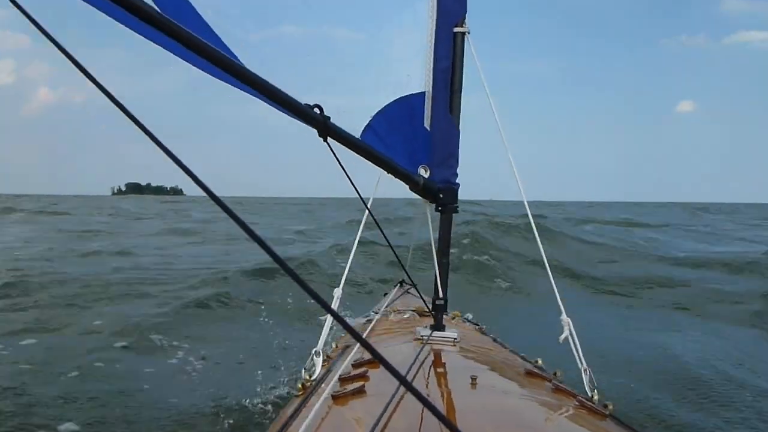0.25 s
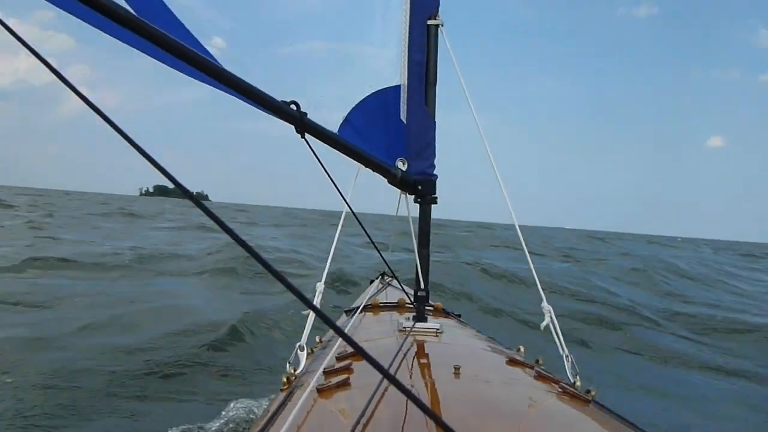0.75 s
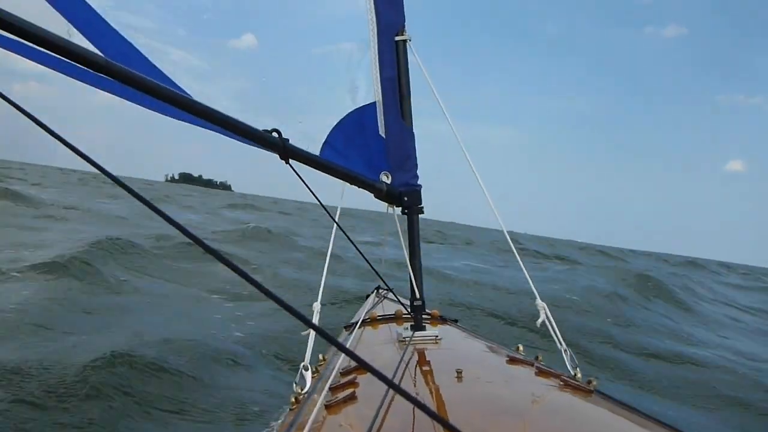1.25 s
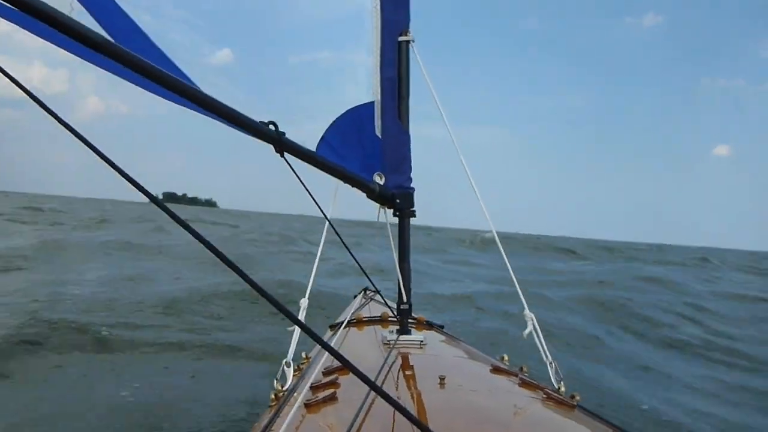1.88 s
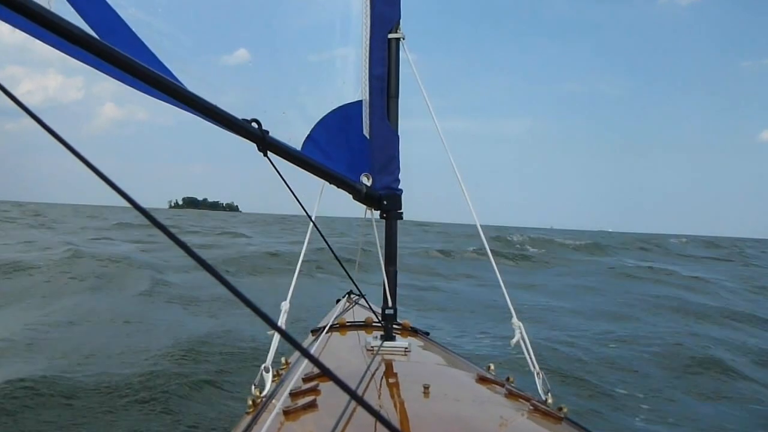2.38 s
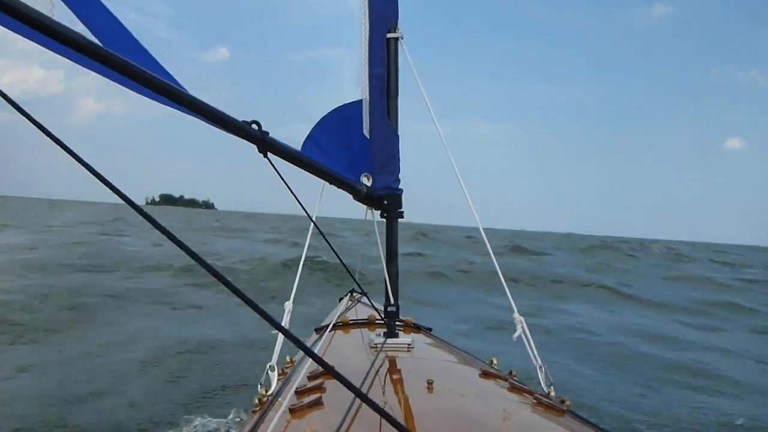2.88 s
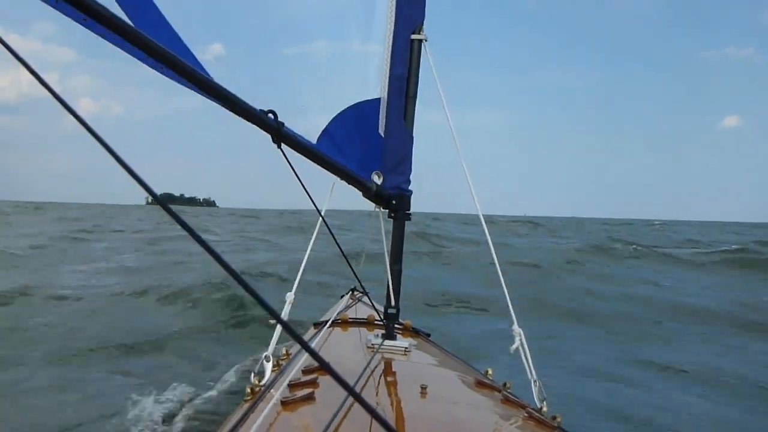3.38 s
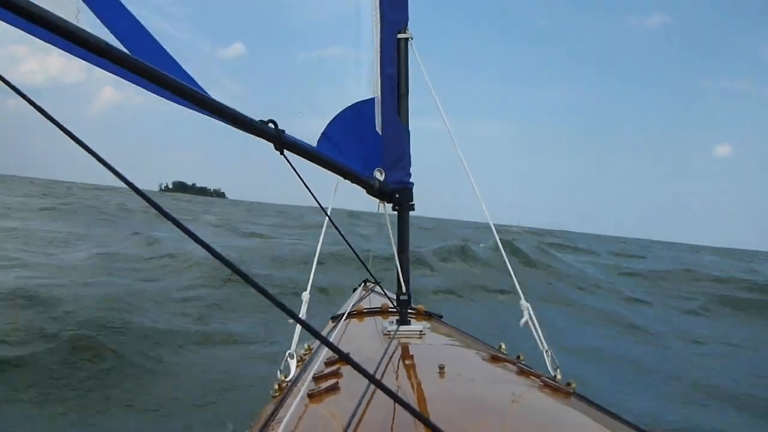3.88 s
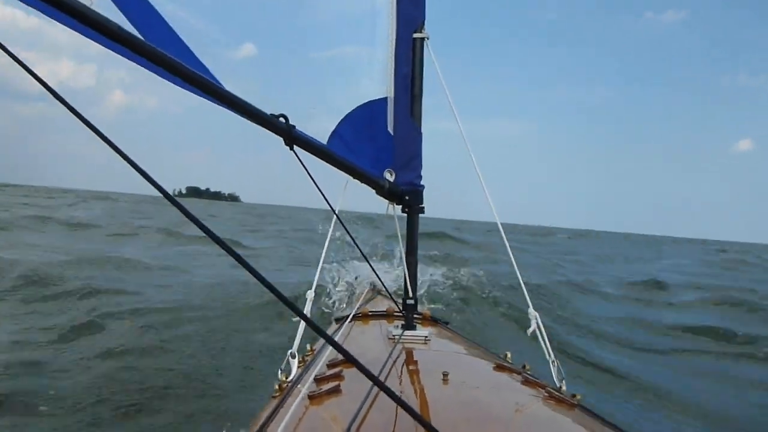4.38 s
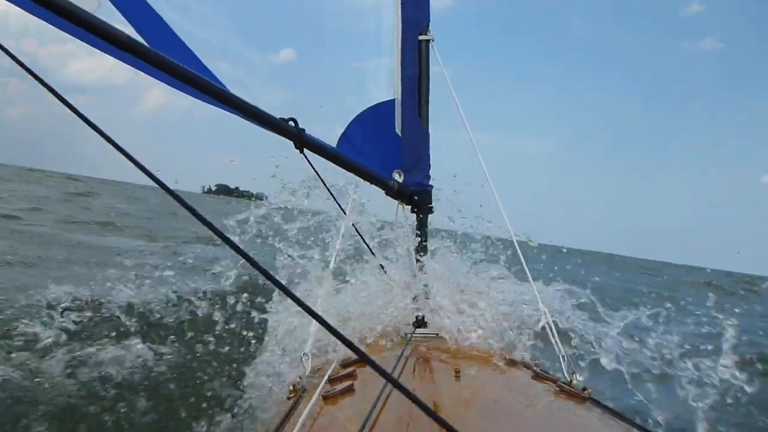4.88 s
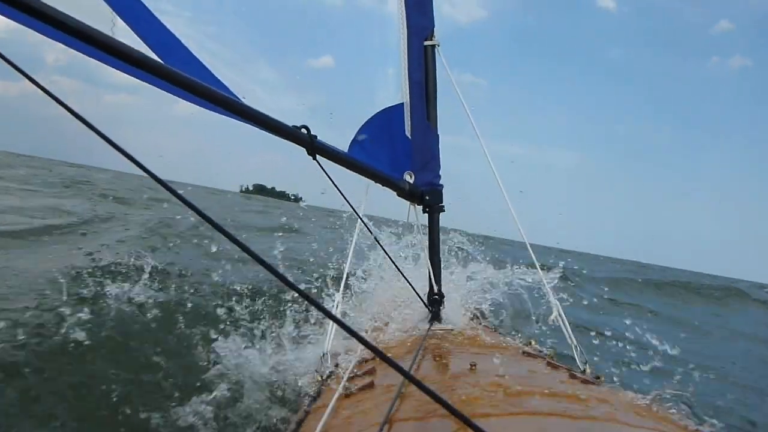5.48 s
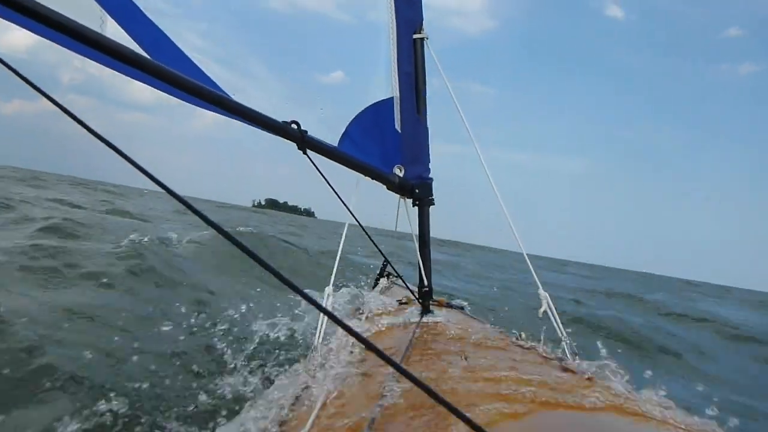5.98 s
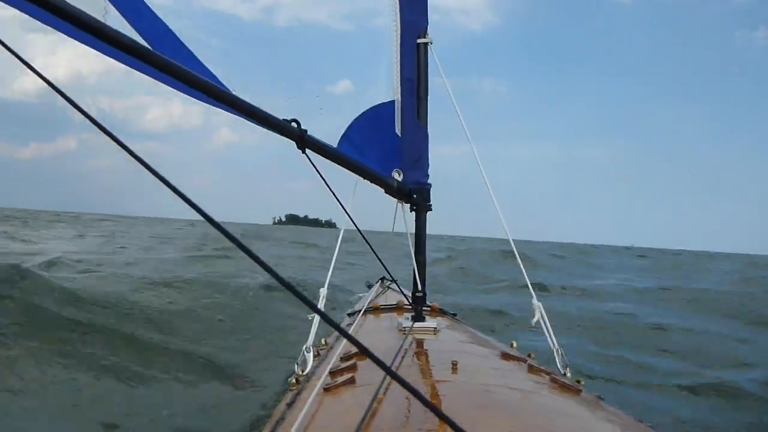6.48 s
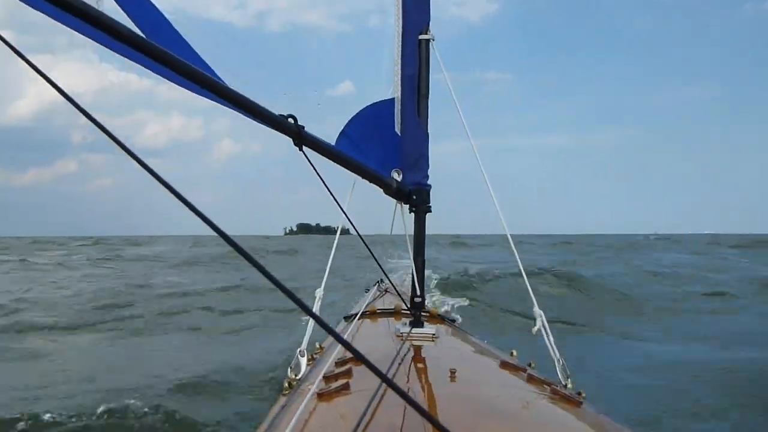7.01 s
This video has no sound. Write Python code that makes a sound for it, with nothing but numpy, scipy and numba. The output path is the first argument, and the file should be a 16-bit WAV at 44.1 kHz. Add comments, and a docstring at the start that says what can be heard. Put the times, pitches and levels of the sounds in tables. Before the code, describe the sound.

Choppy waves glug and slosh against a small wooden sailboat as spray hisses, drops tick on deck and wind thumps the microphone.

```python
"""Small wooden boat in chop

A camera in the cockpit hears water rushing along the hull. The wash is hiss full of bursting
bubbles, with finer spray above it. Waves glug against the planks, drops tick on the deck
and gusts rumble and thump on the microphone port."""
import sys
import numpy as np
from scipy import signal
from scipy.fft import rfft, irfft
from scipy.io import wavfile
from scipy.ndimage import uniform_filter1d
from numba import njit

SR = 44100
rng = np.random.default_rng(int(sys.argv[2]) if len(sys.argv) > 2 else 0)


def generate_wav(signal):
    """Clip the signal to [-1, 1] and save it as 16-bit WAV at the path in sys.argv[1]."""
    frames = np.transpose(np.atleast_2d(signal))
    scaled = np.clip(frames, -1, 1) * 32767
    pcm = np.round(scaled).astype(np.int16)
    wavfile.write(sys.argv[1], SR, pcm)


N = 319725
TOP_HZ = 7850  # camera band edge


def undb(db):
    """Decibels to gain."""
    return 10 ** (np.asarray(db) / 20)


def unit(x):
    """Scale to rms 1."""
    return x / np.sqrt(np.mean(x ** 2))


def colour_db(spectrum, hz):
    """Interpolate a spectrum over log frequency; -90 dB outside it."""
    freq_hz, level_db = np.transpose(spectrum)
    return np.interp(np.log(hz), np.log(freq_hz), level_db, left=-90, right=-90)


def walk(rate_hz):
    """Smoothed random steps, slow drift removed, standard deviation 1."""
    hold = int(SR / rate_hz)
    steps = np.repeat(rng.standard_normal(N // hold + 1), hold)
    smooth = uniform_filter1d(uniform_filter1d(steps, hold), hold)[:N]
    flutter = smooth - uniform_filter1d(smooth, 3 * hold)
    return flutter / flutter.std()


@njit
def grains(peak, hz, tau, gain, glide, phase, rise):
    """Gliding rings that swell and die; peak and tau in samples, rise in taus, glide per tau."""
    out = np.zeros(N)
    for k in range(len(peak)):
        start, angle = int(peak[k] - rise * tau[k]), phase[k]
        for j in range(int((rise + 5) * tau[k])):
            age = j / tau[k] - rise
            angle += 2 * np.pi * hz[k] * (1 + glide[k] * min(age, 1.5)) / SR
            if age < 0:
                envelope = np.sin(.5 * np.pi * (1 + age / rise)) ** 2
            else:
                envelope = (1 + 2 * age) * np.exp(-2 * age)
            if 0 <= start + j < N:
                out[start + j] += gain[k] * envelope * np.sin(angle)
    return out


def hiss(spectrum, swell_db, flicker_db, flicker_hz):
    """Noise in half-octave bands that swell together and flicker separately."""
    hz = np.maximum(np.fft.rfftfreq(N, 1 / SR), 1)
    coloured = rfft(rng.standard_normal(N)) * undb(colour_db(spectrum, hz))
    out = 0
    for band in range(int(2 * np.log2(spectrum[0][0])), int(2 * np.log2(spectrum[-1][0])) + 2):
        share = np.clip(1 - abs(2 * np.log2(hz) - band), 0, 1)
        out = out + irfft(coloured * share, N) * undb(flicker_db * walk(flicker_hz))
    return unit(out * undb(swell_db))


def swarm(spectrum, cycles, glide, scatter_db, count):
    """Rings at random times and pitches; most weak, a few loud."""
    when, where, strength, turn = rng.random((count, 4)).T
    lo, hi = np.sqrt(spectrum[0][0]), np.sqrt(spectrum[-1][0])
    hz = (lo + (hi - lo) * where) ** 2
    gain = hz ** 0.74 * undb(colour_db(spectrum, hz) - scatter_db * np.log(1 - .99 * strength))
    return unit(grains(when * N, hz, cycles * SR / hz, gain, glide * turn, 2 * np.pi * turn, rise=0.4036))


def rings(events, cycles, side_gain, spread_oct, side_length, glide=0):
    """One main ring per event, made dry by four shorter side rings at random pitches."""
    time_s, level_db, hz = np.transpose(events)[:3]
    gain = undb(level_db)
    glide = glide + np.zeros_like(hz)
    tau = cycles * SR / hz / 1.63
    phase = 2 * np.pi * rng.random(len(hz))
    out = grains(time_s * SR - 0.296 * tau, hz, tau, gain, glide, phase, rise=0.305)
    for side in (-1.1, -0.58, 0.1, 0.94):
        detune, late, turn = rng.random((len(hz), 3)).T
        side_hz = np.minimum(hz * 2 ** (spread_oct * side * (.5 + detune)), TOP_HZ - 1000)
        peak = time_s * SR + tau * (late - .6)
        out += grains(peak, side_hz, side_length * tau, side_gain * gain, glide, 2 * np.pi * turn, 0.28)
    return out


def splats(events, cycles, band_hz, gain_db):
    """Dry noise crack at each onset, as water breaks on the wood."""
    time_s, level_db, hz = np.transpose(events)[:3]
    tau = cycles * SR / hz
    zero = np.zeros_like(hz)  # a 0 Hz grain is a bare envelope
    envelope = grains(time_s * SR - tau, zero, tau, undb(level_db + gain_db), zero, zero + np.pi / 2, .39)
    bandpass = signal.butter(2, band_hz, "band", fs=SR, output="sos")
    return signal.sosfilt(bandpass, envelope * rng.standard_normal(N))


def gust_gain(t):
    """Each gust climbs out of the lull, holds and dies away."""
    # start_s, hold_s, level_db
    gusts = [(0.156, 0.0092, -42), (0.244, 0.017, -35), (0.375, 0.017, -36), (0.61, 0.022, -32.5),
             (0.71, 0.033, -41), (0.872, 0.31, -35), (1.232, 0.17, -36.5), (1.46, 0.13, -31.5),
             (1.7, 0.078, -40), (1.782, 0.089, -28.5), (1.958, 0.17, -33.5), (2.196, 0.22, -45),
             (2.424, 0.021, -33.5), (2.687, 0.054, -43), (2.86, 0.026, -42.5), (3.08, 0.037, -31),
             (3.127, 0.17, -39), (3.47, .03, -36.5), (3.68, 0.058, -42), (3.785, 0.046, -28),
             (4.125, 0.035, -32.5), (4.69, 0.016, -48), (4.904, .02, -40), (5.07, .02, -38.5),
             (6.287, 0.058, -37.5), (6.62, 0.091, -45), (6.722, 0.26, -34), (6.946, 0.12, -34)]
    lull_db, rise_db_per_s, fall_db_per_s = -53, 500, 298.5
    power = undb(lull_db) ** 2
    for start_s, hold_s, level_db in gusts:
        before_db = rise_db_per_s * np.maximum(start_s - t, 0)
        after_db = fall_db_per_s * np.maximum(t - start_s - hold_s, 0)
        power = power + undb(level_db - before_db - after_db) ** 2
    return np.sqrt(power)


def wind():
    """Turbulence on the microphone port: lumpy rumble and single-cycle puffs."""
    # freq_hz, density_db
    spectrum = [(15, -52.5), (25, -34.5), (64, -7), (161, -1.5), (330, 0.5), (392, -5.5), (430, -9),
                (600, -28.5), (780, -40.5), (1320, -120)]
    lumps_db = 1.9 * walk(18)
    rumble = hiss(spectrum, lumps_db, flicker_db=2.2, flicker_hz=12)
    puffs = swarm(spectrum, cycles=0.75, glide=-0.023, scatter_db=0.8, count=600)
    return unit(rumble + .5 * puffs * undb(lumps_db))


def thumps():
    """Single wind buffets on the port."""
    # time_s, level_db, pitch_hz
    buffets = [(0.2544, -19, 297), (0.39, -28, 200), (0.6366, -23, 170), (0.9808, -17.5, 169),
               (1.0097, -18, 394), (1.0302, -14.5, 348), (1.0511, -19, 250), (1.0661, -16, 218),
               (1.1165, -26, 286), (1.1559, -16, 368), (1.2447, -23.5, 241), (1.2721, -19, 342),
               (1.3469, -22.5, 240), (1.3704, -26, 332), (1.4976, -21, 300), (1.533, -20, 200),
               (1.5525, -11, 345), (1.5929, -22, 302), (1.756, -24, 250), (1.8039, -24, 193),
               (1.8598, -17, 368), (1.8982, -20, 202), (1.9281, -15, 202), (1.994, -12, 406),
               (2.0643, -18, 260), (2.435, -24, 202), (3.075, -17, 247), (3.1454, -24, 237),
               (3.499, -28, 170), (3.7764, -21, 257), (3.8273, -23, 172), (4.152, -26, 170),
               (6.7551, -23, 282), (6.7756, -17, 352), (6.8519, -22, 177), (6.8679, -21, 350),
               (7.02, -21.5, 208), (7.0839, -24.5, 187)]
    return rings(buffets, cycles=2.38, side_gain=0.23, spread_oct=1.0, side_length=0.75)


def sea_gains(t):
    """Gains of wash, gurgle and spray: the slow run of the water plus quick sloshes and lulls."""
    # time_s, wash_db, gurgle_over_wash_db, spray_over_wash_db
    run = [(0, -33.5, -3.5, -8), (.3, -33, -2, -10), (.7, -36.5, -1.5, -8.5), (.9, -34, -6, -9.5),
           (1.08, -41, -2.5, -8.5), (1.3, -38.5, -1.5, -9), (1.65, -38, -3.5, -7.5),
           (1.95, -33, -2.5, -8.5), (2.12, -31.5, -4, -8), (2.3, -26.5, -4, -7.5), (2.58, -26, -9, -6),
           (2.72, -31.5, -4, -7.5), (2.97, -32, -2.5, -6.5), (3.25, -30.5, -5, -11),
           (3.55, -28, -1.5, -7.5), (3.9, -28.5, 1.5, -7.5), (4.3, -29, -0.5, -7), (4.62, -28.5, 0, -7.5),
           (4.85, -25.5, -8, -7.5), (5.2, -24, -7.5, -6), (5.45, -21, -4.5, -6.5), (5.9, -24.5, -3, -7.5),
           (6.28, -22, -5, -7), (6.5, -29, -5.5, -8), (6.75, -30, -6, -7.5), (6.95, -35.5, -2.5, -7.5),
           (7.25, -34.5, -1.5, -7)]
    # small waves on the hull: time_s, width_ms, wash_swell_db, gurgle_swell_db, spray_swell_db
    sloshes = [(0.21, 30, -0.5, 4, 2.5), (0.85, 30, 2, 1, 2), (0.94, 15, 2, -4, -1.5),
               (1.09, 12, -4, -7, 0), (1.19, 21, -0.5, -5, -4), (1.43, 25, 4, -2, 1.5),
               (1.55, 15, 5.5, 4, 1), (1.7, 26, 5, 1, 0.5), (1.748, 18, 9, 7, 11), (2.04, 18, -2, 15.5, -4),
               (2.16, 22, -3, 7, -1), (2.22, 23, 3.5, 5.5, 0.5), (2.54, 21, 3.5, 6.5, 3),
               (2.81, 47, 5.5, 0.5, -1), (3.14, 34, 1.5, 1, 4), (3.31, 28, 1.5, 7, 5.5),
               (3.61, 28, 3, 3, 0.5), (3.74, 72, 4, -9, 4), (3.88, 25, 0, 8, 0), (4.0, 20, -1.5, 4, -2.5),
               (4.2, 34, 3, -3, 1.5), (4.54, 24, 2, 5, -2), (4.71, 54, 3, 0, 4), (5.089, 64, 3, 0, 3.5),
               (5.29, 45, -1.5, -7, -2.5), (5.45, 46, 1, 0, -1.5), (6.07, 55, 4.5, 2.5, 2),
               (6.33, 20, 0.5, -6, -2), (6.78, 23, -2.5, 5, 0), (7.13, 33, 5.5, -2, 1)]
    time_s, wash_db, gurgle_db, spray_db = np.transpose(run)
    tracks_db = (wash_db, wash_db + gurgle_db, wash_db + spray_db)
    level_db = np.array([np.interp(t, time_s, db) for db in tracks_db])
    for centre_s, width_ms, *swell_db in sloshes:
        width_s = width_ms / 1000 * np.where(t < centre_s, 0.69, 1)  # faster in than out
        level_db += np.outer(swell_db, np.exp(-((t - centre_s) / width_s) ** 2))
    return undb(level_db)


def spray(surge):
    """Foam and thrown droplets: fine hiss with crackle."""
    # freq_hz, density_db
    spectrum = [(1200, -12), (2000, -11), (3000, 4.5), (4200, -1.5), (5500, -4.5), (6500, -9), (8000, -31)]
    crackle = swarm(spectrum, cycles=2.2, glide=.05, scatter_db=4.5, count=9000)
    foam = hiss(spectrum, 0.36 * surge, flicker_db=0.68, flicker_hz=22)
    return unit(foam + 0.67 * crackle * undb(surge))


def drops():
    """Drops ticking on the deck."""
    # time_s, level_db, pitch_hz
    hits = [(0.8511, -30, 3640), (1.0319, -28.5, 2560), (1.0651, -30.5, 3780), (1.1092, -21, 3280),
            (1.1259, -20.5, 4100), (1.2112, -26.5, 6000), (1.308, -35, 5060), (1.3195, -29, 5250),
            (1.7615, -28, 3600), (1.8139, -28, 2900), (1.8221, -27, 4020), (1.9887, -31, 4750),
            (2.311, -21.5, 3130), (2.5732, -19.5, 5160), (2.6096, -21, 5200), (3.0481, -29, 5260),
            (3.0977, -25.5, 4450), (3.1177, -26, 4400), (3.1528, -18.5, 3300), (3.1788, -24, 4460),
            (3.3082, -17, 3600), (3.6869, -24, 5170), (3.7739, -21, 3980), (3.953, -21.5, 3450),
            (4.3434, -18.5, 5260), (4.7796, -21.5, 4900), (5.186, -19, 4070), (5.8996, -19, 2130),
            (5.9567, -12, 2420), (6.3311, -20, 4630)]
    ticks = rings(hits, cycles=10, side_gain=0.6, spread_oct=0.32, side_length=.35)
    return ticks + splats(hits, cycles=5.4, band_hz=(3000, 5100), gain_db=1.2)


def glugs():
    """Air pockets ringing along the planks."""
    # time_s, level_db, pitch_hz, length_cycles, glide_per_tau
    pockets = [(0.0609, -22.5, 690, 6.4, -0.023), (0.126, -23, 1800, 9.5, .14),
               (0.1741, -22, 686, 9, -0.14), (0.2088, -17.5, 1210, 11, -0.29),
               (0.3562, -18.5, 1480, 8.2, .03), (0.5253, -23.5, 690, 9, .03), (0.835, -20, 784, 9, -0.08),
               (0.8513, -16.5, 1440, 5.2, 0.11), (0.9419, -24, 730, 7.7, .3),
               (1.3125, -27, 1650, 10.5, -.08), (1.4829, -25, 1040, 6.7, 0.0067),
               (1.5515, -23, 1290, 10.5, -0.14), (1.8129, -21.5, 1290, 7.3, .01),
               (2.0383, -22, 453, 7.1, 0.17), (2.0463, -17.5, 405, 6.5, -0.059),
               (2.0603, -17.5, 1020, 6.1, 0.1), (2.2107, -17, 1200, 4.8, -0.05),
               (2.4971, -11, 1010, 6.2, 0.034), (2.5846, -19, 660, 9.5, .23),
               (2.6555, -20.5, 1160, 11, .08), (3.0366, -25, 460, 6, 0.06), (3.1052, -20, 348, 6.3, .01),
               (3.1307, -20, 330, 3.9, .01), (3.1611, -21.5, 653, 14, -0.07),
               (3.3015, -22.5, 460, 14, -0.002), (3.3389, -15, 1010, 8.6, -0.24),
               (3.4093, -19, 360, 4.3, .01), (3.421, -21, 1200, 15.5, 0.0058),
               (3.5265, -23.5, 388, 8.3, -0.099), (3.5605, -19, 384, 4.5, .01),
               (3.6163, -14.5, 420, 9.5, 0.055), (3.6342, -14, 392, 4, -0.036), (3.6627, -19, 380, 4, .01),
               (3.6862, -20, 380, 4.4, -0.08), (3.7185, -14, 1590, 9, .08), (3.7809, -12, 1820, 7.7, 0.31),
               (3.8191, -16.5, 1880, 8, .01), (3.8273, -19.5, 396, 8, .01), (3.8812, -12.5, 572, 9.5, .09),
               (3.903, -18, 297, 5, -0.019), (3.972, -23, 430, 8.3, 0.037), (3.9837, -19, 870, 9.5, -0.023),
               (4.0051, -15, 492, 6.9, -0.011), (4.1284, -16.5, 650, 12, 0.048),
               (4.1927, -18, 733, 12, 0.03), (4.2758, -18, 655, 11, 0.049), (4.2962, -19, 930, 10.5, 0.14),
               (4.3439, -17, 1640, 7.8, 0.16), (4.3814, -22, 390, 5.1, -0.032),
               (4.5389, -15.5, 990, 11, .38), (4.639, -15.5, 600, 8, 0.49), (4.6913, -13, 747, 12, 0.14),
               (4.7098, -16, 1590, 7.7, 0.065), (4.9123, -21, 353, 6.2, -0.043),
               (5.0755, -17.5, 710, 10.5, .25), (5.1725, -12.5, 1000, 8, -.07),
               (5.4269, -15.5, 577, 9, .01), (5.4773, -10.5, 606, 7.3, 0.08),
               (5.5025, -15, 513, 9.4, -0.078), (6.0782, -11, 1480, 8.2, -0.073),
               (6.163, -23.5, 443, 15, 0.021), (6.5531, -17, 1110, 4.9, 0.029),
               (6.617, -20.5, 850, 10.5, .19), (7.142, -21, 1090, 4.5, .03), (7.1932, -26, 460, 9, 0.24)]
    cycles, glide = np.transpose(pockets)[3:]
    ringing = rings(pockets, cycles, side_gain=0.15, spread_oct=.9, side_length=0.34, glide=glide)
    return ringing + splats(pockets, cycles=2.6, band_hz=(420, 2570), gain_db=2.7)


def wash(surge):
    """Water sliding along the hull, with bubbles rising in pitch; returns low gurgle and upper rush."""
    # freq_hz, density_db
    spectrum = [(88, -37), (150, -37), (182, -16.5), (495, 3), (708, 3), (827, 3), (1560, 0), (2600, -6.5),
                (3380, -44.5), (5720, -120)]
    flow = hiss(spectrum, 0.47 * surge, flicker_db=1.47, flicker_hz=16)
    bubbles = swarm(spectrum, cycles=3.964, glide=0.086, scatter_db=1.3, count=4000)
    water = unit(flow + 0.68 * bubbles * undb(1.54 * surge))
    gurgle = signal.sosfiltfilt(signal.butter(2, 680, fs=SR, output="sos"), water)
    return unit(gurgle), unit(water - gurgle)


def scene():
    """Wind, wash and spray with single events on top; mono."""
    t = np.arange(N) / SR
    wash_gain, gurgle_gain, spray_gain = sea_gains(t)
    surge = unit(walk(14) + walk(35))  # small waves breaking in quick bursts
    gurgle, rush = wash(surge)
    bed = gust_gain(t) * wind() + gurgle_gain * gurgle + wash_gain * rush + spray_gain * spray(surge)
    return (bed + drops() + glugs() + thumps())[None]


def record(dry):
    """The camera cuts bass and notches one band; its low sample clock faintly mirrors the treble."""
    # freq_hz, gain_db
    mirror_response = [(8150, -74), (8250, -0.5), (8700, -12), (9250, -19), (9800, -30.5), (10300, -52),
                       (10700, -61)]
    notch_hz, notch_width_hz = 2891, 190
    clock_hz, mirror_top_hz = 16000, 10700
    x = signal.sosfilt(signal.butter(3, 75, "high", fs=SR, output="sos"), dry)
    x = signal.sosfilt(signal.butter(4, 6000, fs=SR, output="sos"), x)  # housing dulls the treble
    x = signal.lfilter(*signal.iirnotch(notch_hz, notch_hz / notch_width_hz, SR), x)
    x = signal.sosfilt(signal.cheby2(14, 40, TOP_HZ, fs=SR, output="sos"), x)
    images = rfft(2 * x * np.cos(2 * np.pi * clock_hz * np.arange(N) / SR))
    mirror_gain = undb(colour_db(mirror_response, np.fft.rfftfreq(N, 1 / SR) + 1))
    mirror = irfft(images * mirror_gain, N)
    return signal.sosfilt(signal.ellip(8, .2, 70, mirror_top_hz, fs=SR, output="sos"), x + mirror)


dry = scene()
out = record(dry)
generate_wav(out)
```